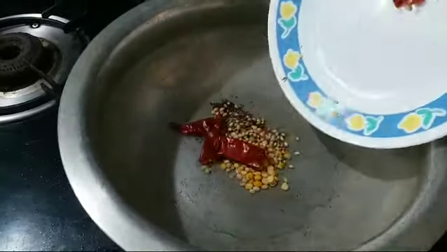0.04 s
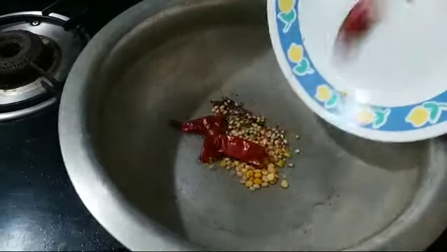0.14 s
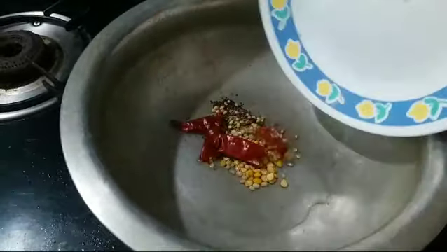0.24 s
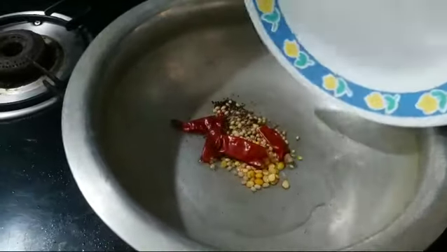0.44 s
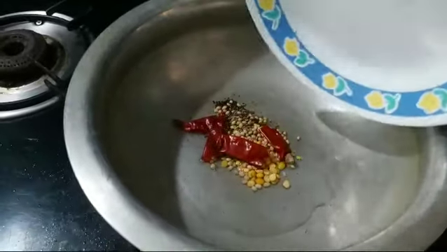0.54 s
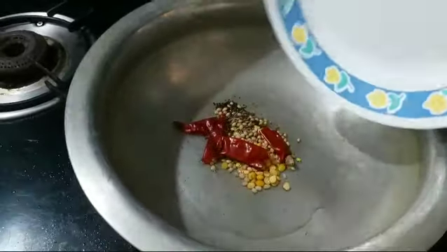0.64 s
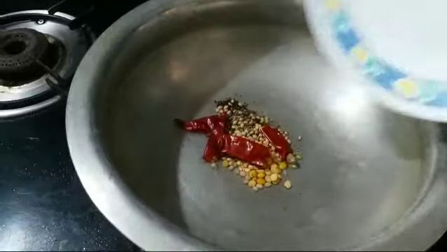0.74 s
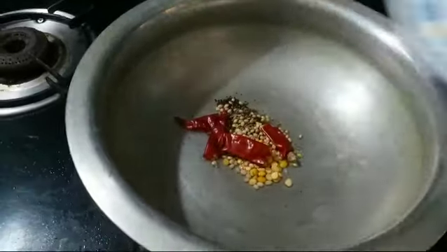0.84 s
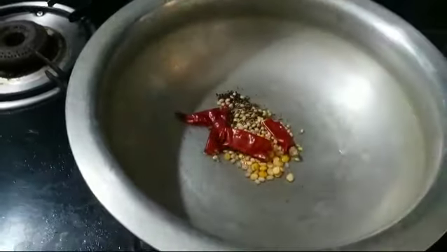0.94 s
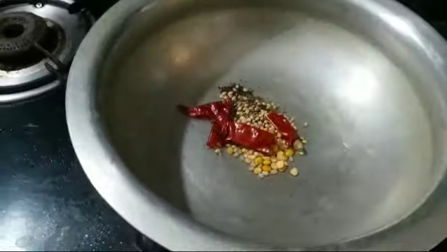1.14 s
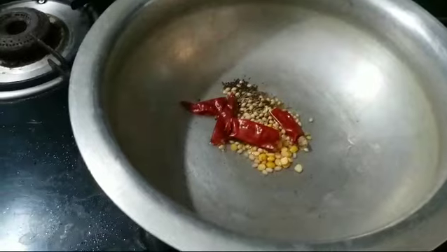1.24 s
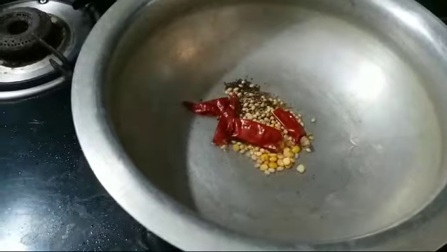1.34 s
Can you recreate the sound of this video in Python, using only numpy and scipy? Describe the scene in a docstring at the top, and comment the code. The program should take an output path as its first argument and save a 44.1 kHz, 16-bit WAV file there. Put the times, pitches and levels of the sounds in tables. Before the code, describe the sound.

Close up in a small, hard-walled kitchen, a dried chilli clacks into a metal pan just after some light seed ticks. The pan rings briefly, leaving a soft fan hiss and a thin, distant whine.

```python
"""A few seeds tick as the last dry spices slide off a plate into a wide metal pan. A dried chilli
scrapes over the rim and lands with a double clack that makes the pan ring. A small, hard kitchen
echoes each hit, and the plate is taken away with a soft rustle. Behind it all a fan hums and
hisses, and a thin, far whine wavers."""
import sys
import numpy as np
from scipy import signal
from scipy.fft import rfft, irfft, next_fast_len
from scipy.io import wavfile

SR = 44100
rng = np.random.default_rng(int(sys.argv[2]) if len(sys.argv) > 2 else 0)


def store_wav(level_fs):
    """Save 16-bit WAV to argv[1]."""
    pcm = np.round(np.clip(np.atleast_2d(level_fs), -1, 1) * 32767)
    wavfile.write(sys.argv[1], SR, pcm.T.astype(np.int16))


N = 61739

# The chilli lands, one end then the other. A fade time is how long a sound takes to drop 60 dB.
# (time [s], crack level [dB], fade time [s], ring level [dB], ring treble boost [dB per octave])
LANDINGS = [(0.2594, -13.5, 0.019, -25.5, -3), (0.2674, -15, 0.012, -32, 9), (.2696, -10.5, 0.013, -25, 3)]
# The tone of a crack: (frequency [Hz], level [dB])
CRACK_TONE = [(60, -16.5), (350, -12.5), (640, -7), (760, -16), (900, 0), (1400, 6), (1750, -3.5),
              (2000, 8), (2500, -1), (3200, 10.5), (4600, 5.5), (5300, 3), (7500, 2), (11000, 1.5),
              (15500, -5)]


def chilli_cracks():
    """The brittle pod cracks against the metal."""
    out = np.zeros((2, N))
    for start, db, fade_s, _, _ in LANDINGS:
        add(out, amp(db) * snap(lambda hz: amp(look_up(CRACK_TONE, hz)), fade_s), start)
    return out


# The notes the pan rings with: (pitch [Hz], level [dB], fade time [s])
PAN_NOTES = [(402.4, -36.5, 0.42), (531.7, -30.5, 0.66), (899.7, -7, 0.055), (975.5, -6.5, 0.066),
             (1146, -8.5, 0.031), (1224, -1.5, 0.037), (1288, -10.5, 0.068), (1390, -4, 0.12),
             (2060, -3, 0.045), (2860, -5, 0.054), (2955, -8, 0.061), (3045, -11, 0.035), (3460, -8, .055),
             (3600, -12, 0.1), (4234, -0.5, 0.038), (4717, 0.5, 0.024), (4830, -9.5, 0.054),
             (5920, -1.5, 0.019), (7210, -3.5, 0.022), (8080, -10, 0.011)]


def pan_ring(pivot_hz=2500, after_ring_db=-22, right_lag_s=0.0002):
    """Each landing rings the pan with its own strength and brightness; a faint after-ring lingers."""
    out, t = np.zeros((2, N)), np.arange(SR // 2) / SR
    hz, db, fade_s = np.transpose(PAN_NOTES)[:, :, None]
    after_ring = amp(after_ring_db) * hit_shape(t, look_up(ECHO_FADE, hz))
    notes = (hit_shape(t, fade_s) + after_ring) * np.exp(2j * np.pi * hz * t)
    stereo_lag = np.exp(-2j * np.pi * hz * [0, right_lag_s])
    for start, _, _, ring_db, treble_db in LANDINGS:
        strength = amp(ring_db + db + treble_db * np.log2(hz / pivot_hz))
        phase = np.exp(2j * np.pi * rng.random(hz.shape))
        add(out, ((strength * phase * stereo_lag).T @ notes).real, start)
    return out


# Light touches of seeds and chilli skin:
# (time [s], level [dB], fade time [s], husk pitch [Hz], husk level [dB])
TOUCHES = [(.0092, -38.5, 0.018, 6150, -12), (0.043, -48, 0.0075, 3030, 8), (.0950, -32, 0.016, 9200, 3.5),
           (0.131, -28.5, 0.0073, 4350, -1), (0.182, -39, 0.0057, 7730, -2), (0.1876, -23, 0.012, 7500, -9),
           (0.193, -27, .02, 4000, -2), (0.203, -21.5, 0.015, 2520, 10.5), (0.2085, -17.5, 0.011, 2470, -1),
           (0.21, -15.5, 0.0083, 3670, 10)]
# The tone all ticks share: (frequency [Hz], level [dB])
TICK_TONE = [(150, -20.5), (850, -16.5), (1300, -10), (2000, -4.5), (4000, 1.5), (7500, -3), (11000, -9.5),
             (15500, -11)]


def spice_ticks(sharpness=4.65):
    """Each light touch is a dry snap, boosted around the pitch at which the husk vibrates."""
    out = np.zeros((2, N))
    for start, db, fade_s, pitch, husk_db in TOUCHES:
        husk = lambda hz: amp(husk_db) / (1 + (sharpness * (hz / pitch - pitch / (hz + 1))) ** 2)
        add(out, amp(db) * snap(lambda hz: amp(look_up(TICK_TONE, hz)) + husk(hz), fade_s), start)
    return out


# How long the echo lasts: (frequency [Hz], fade time [s])
ECHO_FADE = [(150, 0.36), (500, 0.7), (1200, 0.36), (4000, 0.35), (8000, 0.28), (15000, 0.27)]
# The tone the echo starts with: (frequency [Hz], level [dB])
ECHO_TONE = [(150, 20), (500, 0.5), (1200, 0.5), (3000, -2.5), (7000, 1.5), (15000, 4)]


def kitchen_echo(x, wall_delay_s=.003):
    """Hard walls close by throw back a dense echo whose treble dies first."""
    hz, t, bands = signal.stft(noise(np.ones_like)[:, :SR], SR, nperseg=256)
    db = look_up(ECHO_TONE, hz)[:, None] - 60 * t / look_up(ECHO_FADE, hz)[:, None]
    tail = signal.istft(bands * amp(db), SR, nperseg=256)[1]
    tail /= np.linalg.norm(tail[0])
    tail = np.pad(tail, ((0, 0), (int(wall_delay_s * SR), 0)))
    return signal.fftconvolve(x, tail, axes=1)[:, :N]


# The tone of the echo heard at the start: (frequency [Hz], level [dB])
FADING_ECHO_TONE = [(150, -2), (500, 3), (1300, 1.5), (3000, 3.5), (7500, -2.5), (15000, -9.5)]


def fading_room_echo(start_db=-48.5, fall_db_per_s=147):
    """The room's echo of earlier hits dies away at the start."""
    return amp(start_db - fall_db_per_s * np.arange(N) / SR) * toned_noise(FADING_ECHO_TONE)


# The tone of the plate's rustle: (frequency [Hz], level [dB])
PLATE_TONE = [(150, -20), (450, -5), (900, -2), (2500, -14), (3600, 5.5), (4800, 1), (8000, -1),
              (15000, -14)]


def plate_rustle(peak_s=1.233, width_s=0.072, peak_db=-66.5):
    """Soft noise swells and fades as the plate is taken away."""
    swell = np.exp(-((np.arange(N) / SR - peak_s) / width_s) ** 2 / 2)
    return amp(peak_db) * swell * toned_noise(PLATE_TONE)


# The tone of the fan's hiss and rumble: (frequency [Hz], level [dB])
HISS_TONE = [(110, -25), (200, -31), (250, -8.5), (400, -4.5), (480, -9), (560, 0), (850, -3), (1050, -6),
             (1400, -5), (1850, -1.5), (2300, -9), (3400, -7.5), (4800, -5.5), (6300, -2.5), (7600, 0.5),
             (8800, -4), (12000, -3.5), (15500, -10.5)]
RUMBLE_TONE = [(20, -39), (33, -6), (48, -14), (68, -7), (88, -4), (110, -4.5), (130, -5), (165, -15),
               (260, -22.5), (600, -35.5)]
# Which side the hiss is on: (frequency [Hz], left minus right [dB])
HISS_BALANCE = [(300, -2), (1500, 1.5), (3000, 0.5), (7300, 7), (11000, 3), (15000, 0.5)]
# How each part of the fan rises and falls: (time [s], level [dB])
HISS_LOUDNESS = [(0, -56), (.5, -63.5), (.62, -63), (.78, -63.5), (.9, -62), (1.05, -61.5), (1.22, -62.5),
                 (1.4, -61.5)]
RUMBLE_LOUDNESS = [(0, -65), (.35, -66), (.52, -72.5), (1.2, -72.5), (1.4, -71)]
HUM_LOUDNESS = [(0, -62.5), (.1, -64), (.18, -77), (.27, -66), (.36, -63.5), (.5, -82), (.86, -84),
                (.93, -73), (1.0, -84), (1.22, -85), (1.3, -68.5), (1.4, -65.5)]


def fan(hum_hz=89):
    """A fan makes a hiss of air, a low rumble and a hum that swells and fades."""
    hiss = amp(over_time(HISS_LOUDNESS)) * balanced(toned_noise(HISS_TONE), HISS_BALANCE)
    rumble = amp(over_time(RUMBLE_LOUDNESS)) * toned_noise(RUMBLE_TONE)
    hum = amp(over_time(HUM_LOUDNESS)) * np.sqrt(2) * np.sin(2 * np.pi * hum_hz * np.arange(N) / SR)
    return hiss + rumble + hum


# How the whine wavers: (time [s], pitch [Hz], level [dB])
WHINE_PATH = [(0, 1602, -66.5), (.14, 1635, -56.5), (.3, 1620, -59), (.46, 1625, -60), (.53, 1610, -68.5),
              (.63, 1640, -60), (.74, 1580, -62), (.88, 1545, -61), (.95, 1570, -67.5), (1.05, 1598, -60),
              (1.17, 1592, -60.5), (1.27, 1554, -65.5), (1.37, 1545, -62.5), (1.4, 1466, -59)]


def far_whine(split_hz=24, width_hz=20, halo_hz=170, halo_db=-13, right_db=1):
    """Two close, fuzzy tones flutter against each other and drift down inside a faint, airy halo."""
    pitch, db = over_time(WHINE_PATH)
    out = np.zeros((2, N))
    parts = (-split_hz, width_hz, 0), (split_hz, width_hz, 0), (halo_hz / 2, halo_hz, halo_db)
    for offset, width, part_db in parts:
        wobble = filtered(rng.standard_normal((2, 2, N)), lambda hz: 1 / (1 + (hz / width) ** 2))
        phase = 2 * np.pi * np.cumsum(pitch + offset) / SR
        out += amp(part_db) * normalised(wobble[0] * np.cos(phase) + wobble[1] * np.sin(phase))
    return amp(db) * normalised(out) * amp([[0], [right_db]])


# How alike the two sides sound: (frequency [Hz], likeness [1 = the same, 0 = unrelated])
STEREO_LIKENESS = [(60, 0.8), (130, .8), (290, .65), (640, .27), (1400, -0.049), (3000, 0.22), (15000, 0)]


def stereo_shares(hz):
    """Gains for what left and right share (mostly bass) and for what sets them apart."""
    angle = np.arccos(np.clip(look_up(STEREO_LIKENESS, hz), -1, 1)) / 2
    return np.array([np.cos(angle), np.sin(angle)])


def snap(gain, fade_s, samples=4096):
    """A few milliseconds of random stereo crackle, its tone set by gain(hz)."""
    shape = hit_shape(np.arange(samples) / SR, fade_s)
    hz = np.fft.rfftfreq(2 * samples, 1 / SR)
    shared, apart = rfft(rng.standard_normal((2, samples)) * shape, 2 * samples) * stereo_shares(hz)
    flat_spectrum = np.exp(1j * np.angle([shared + apart, shared - apart]))
    x = irfft(flat_spectrum * gain(hz))[:, :samples]
    return x * np.linalg.norm(shape) / np.linalg.norm(x, axis=1, keepdims=True)


def hit_shape(t, fade_s, rise_s=.0005):
    """The loudness of a hit: a quick rise, then a smooth fade."""
    return (1 - np.exp(-t / rise_s)) * np.exp(-np.log(1000) * t / fade_s)


def noise(gain):
    """Noise from all around, its tone set by gain(hz)."""
    shared, apart = filtered(rng.standard_normal((2, N)), lambda hz: gain(hz) * stereo_shares(hz))
    return normalised(np.array([shared + apart, shared - apart]))


def toned_noise(tone):
    """Noise shaped by a tone table."""
    return noise(lambda hz: amp(look_up(tone, hz)))


def thinned(x, cutoff_hz=312):
    """Light things give off little bass."""
    return signal.sosfilt(signal.butter(2, cutoff_hz, 'high', fs=SR, output='sos'), x)


def balanced(x, balance):
    """Tip each frequency to the left or right."""
    return filtered(x, lambda hz: amp(np.outer([.5, -.5], look_up(balance, hz))))


def filtered(x, gain):
    """Turn each frequency up or down by gain(hz)."""
    size = next_fast_len(N + SR // 2)
    return irfft(rfft(x, size) * gain(np.fft.rfftfreq(size, 1 / SR)), size)[..., :N]


def look_up(table, hz):
    """Read between the rows of a frequency table, on an octave scale."""
    frequencies, values = np.transpose(table)
    return np.interp(np.log(hz + 1), np.log(frequencies + 1), values)


def over_time(table):
    """One value per sample for each column after the time."""
    times, *columns = np.transpose(table)
    return [np.interp(np.arange(N) / SR, times, column) for column in columns]


def amp(db):
    """Turn decibels into a gain."""
    return 10 ** (np.asarray(db) / 20)


def normalised(x):
    """Scale to an average strength (rms) of 1."""
    return x / np.sqrt(np.mean(x ** 2) + 1e-20)


def add(out, x, start_s):
    """Mix x into out at a given time."""
    part = out[:, round(start_s * SR):][:, :x.shape[1]]
    part += x[:, :part.shape[1]]


# Which side the near sounds and the room are on: (frequency [Hz], left minus right [dB])
NEAR_BALANCE = [(300, 4), (1200, -4), (2400, 3.5), (4400, 1), (8000, 9.5), (11000, 10.5), (15000, 0)]
ROOM_BALANCE = [(300, 0), (1300, 0), (2400, -3.5), (4400, 2.5), (8000, 4), (15000, -1.5)]


def scene(tick_echo_db=1, crack_echo_db=-1):
    """The spices and the pan up close, then the room, then the background."""
    ticks, cracks, ring = thinned(spice_ticks()), thinned(chilli_cracks()), thinned(pan_ring())
    near = balanced(ticks + cracks + ring, NEAR_BALANCE)
    echo = amp(tick_echo_db) * kitchen_echo(ticks) + amp(crack_echo_db) * kitchen_echo(cracks)
    room = balanced(echo + fading_room_echo(), ROOM_BALANCE)
    return near + room + fan() + far_whine() + plate_rustle()


def record(dry, low_hz=41, top_hz=15900):
    """Drop the deepest bass and the highest treble."""
    return filtered(dry, lambda hz: (hz < top_hz) * (1 - 1 / (1 + (hz / low_hz) ** 10)))


dry = scene()
out = record(dry)
store_wav(out)
```